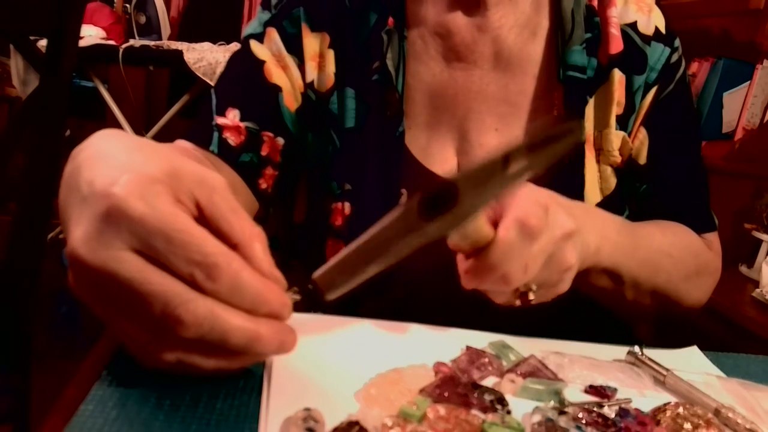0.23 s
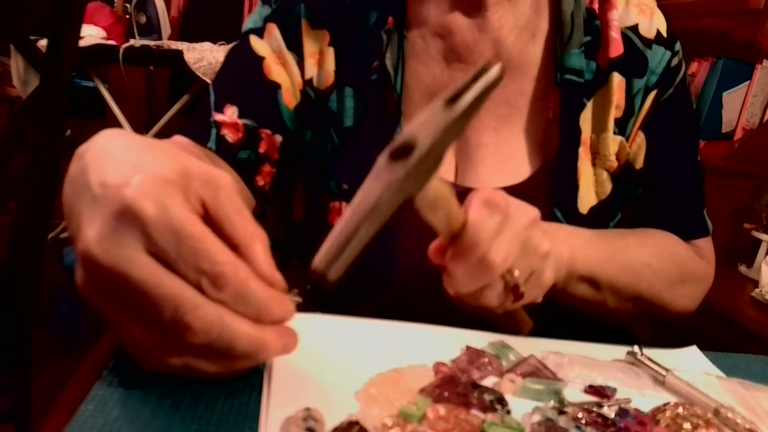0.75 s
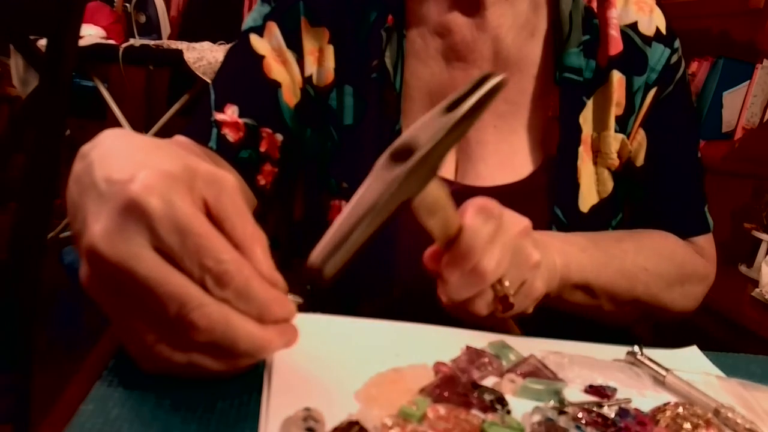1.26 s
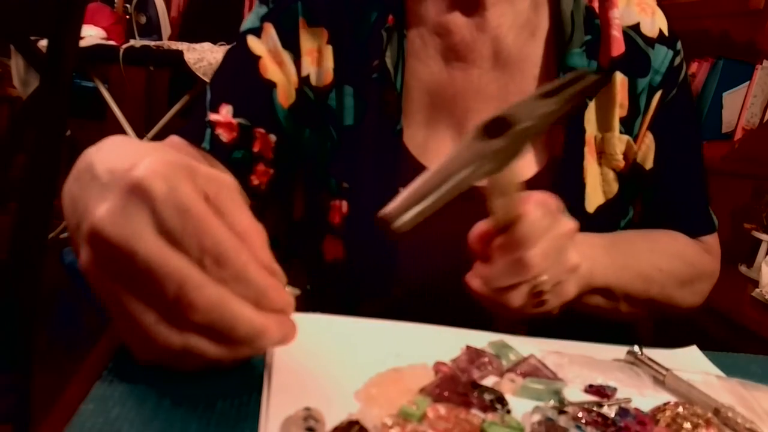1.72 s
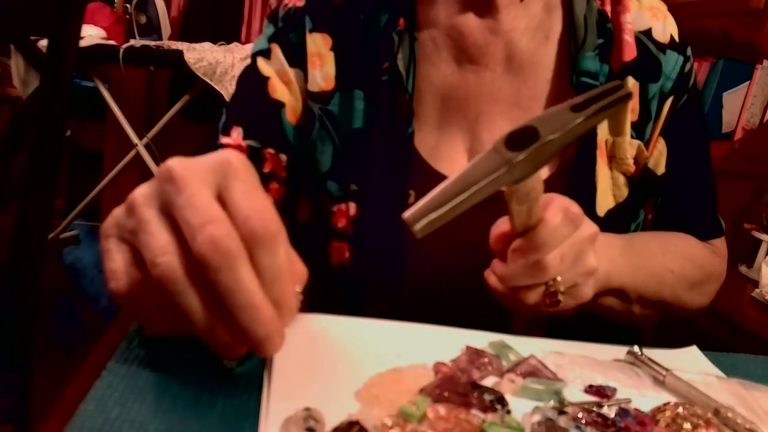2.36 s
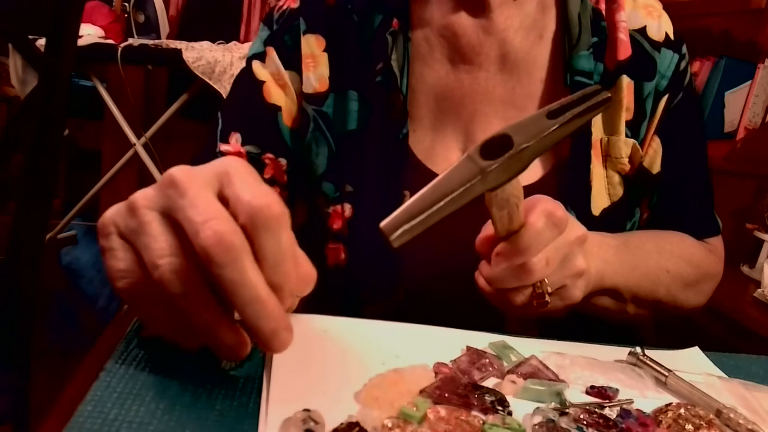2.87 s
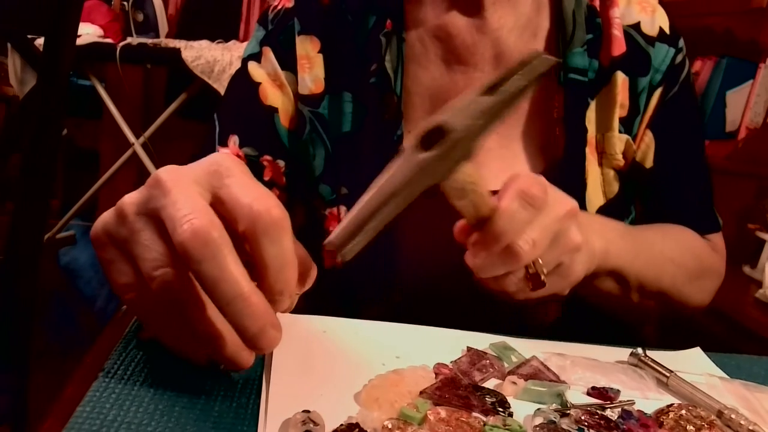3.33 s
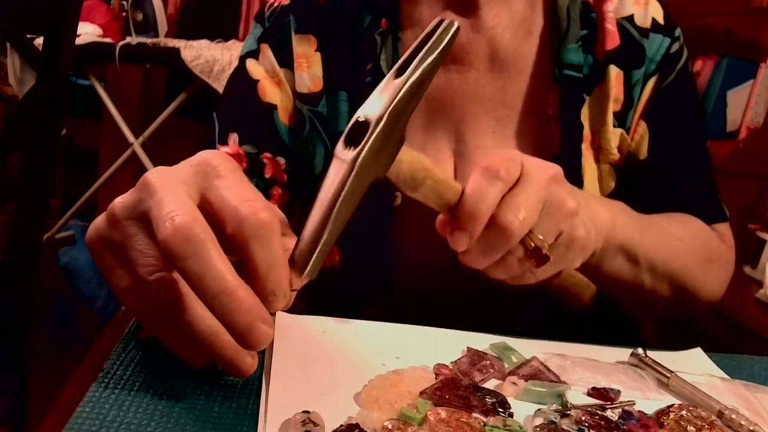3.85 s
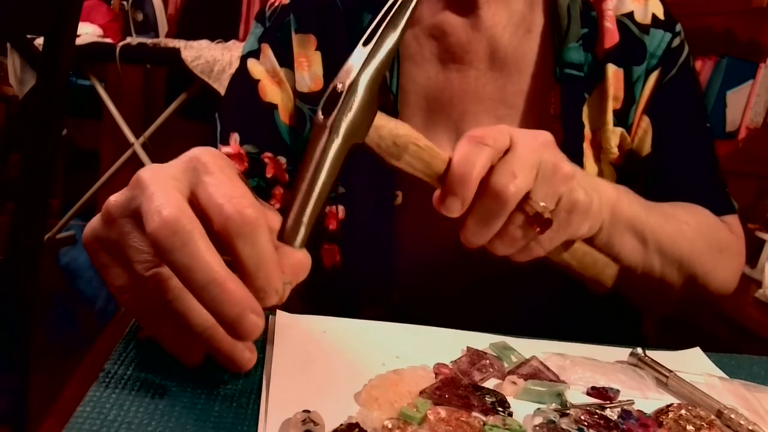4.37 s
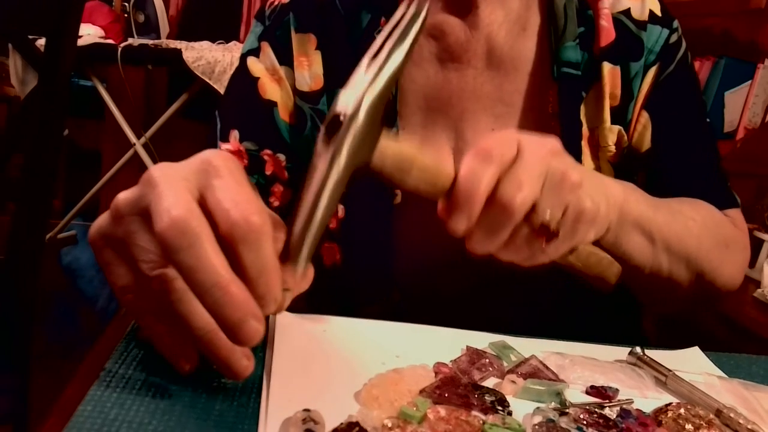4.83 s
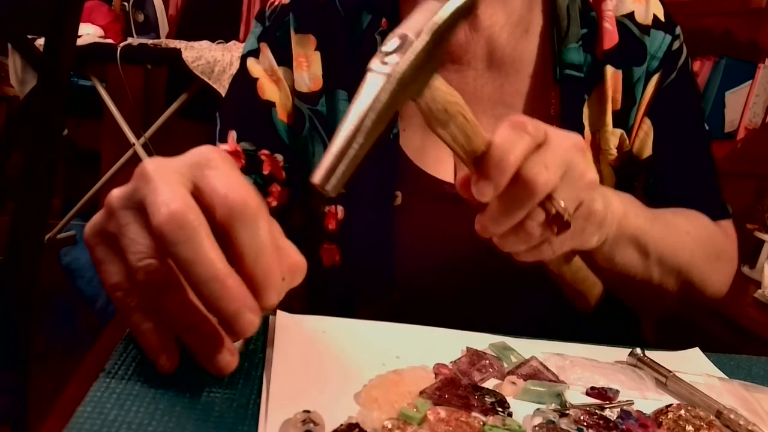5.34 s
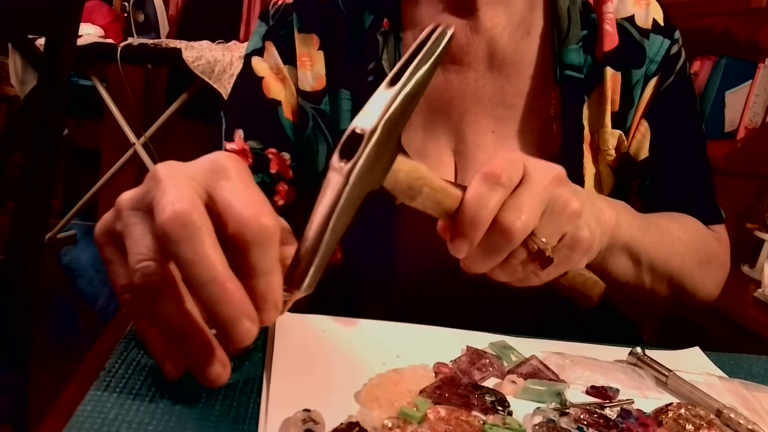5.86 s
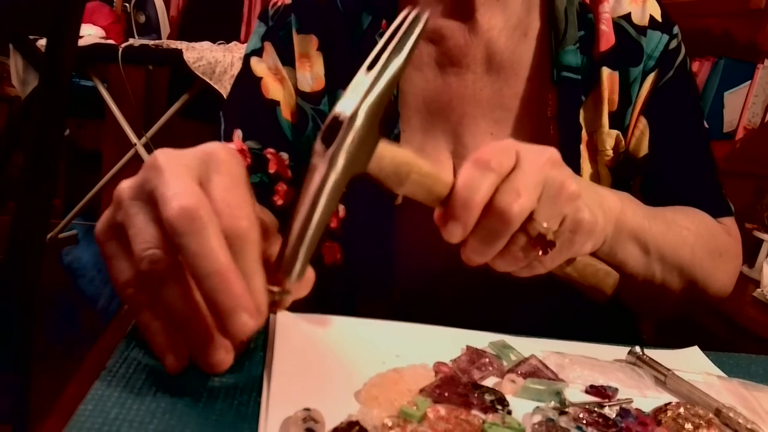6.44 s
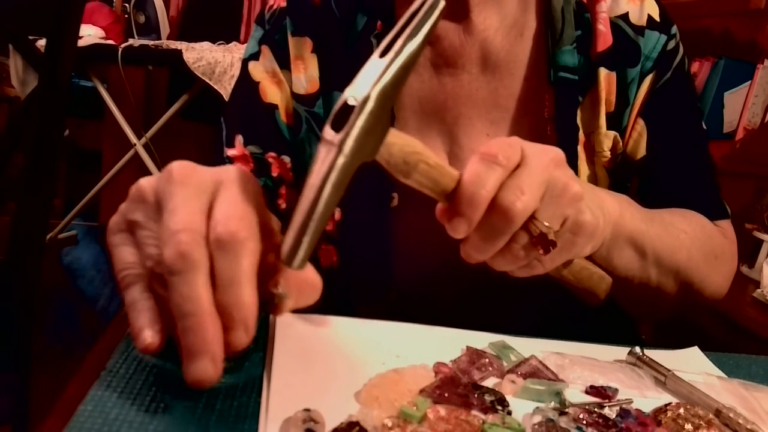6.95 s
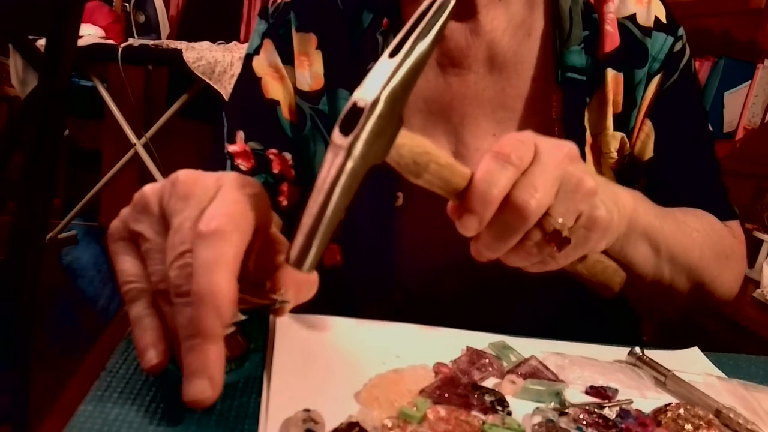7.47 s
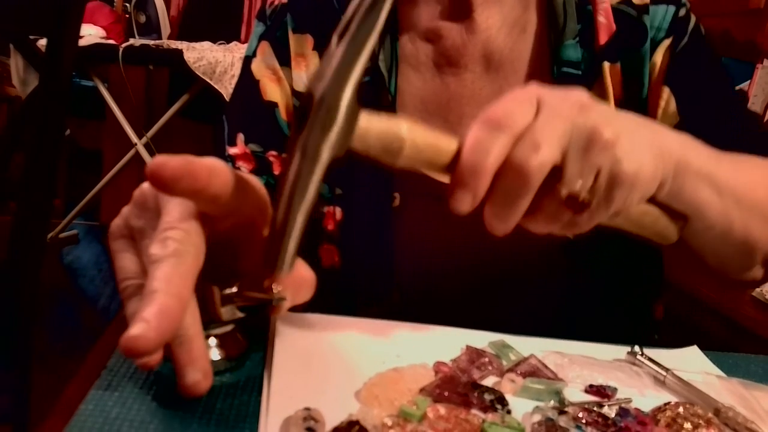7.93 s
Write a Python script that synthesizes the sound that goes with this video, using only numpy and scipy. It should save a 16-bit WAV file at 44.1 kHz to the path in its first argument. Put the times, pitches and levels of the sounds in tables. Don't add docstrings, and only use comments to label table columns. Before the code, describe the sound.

Sparse close metallic hammer blows on a small anvil, some feather-light, some sharp and clipping, with thin high ringing over soft fan hiss.

```python
import sys
import numpy as np
from scipy import signal
from scipy.fft import rfft, irfft, next_fast_len
from scipy.io import wavfile
from scipy.ndimage import uniform_filter1d, map_coordinates

SR = 44100
rng = np.random.default_rng(int(sys.argv[2]) if len(sys.argv) > 2 else 0)


def inscribe(sig):
    pcm = np.round(np.clip(np.atleast_2d(sig).T, -1, 1) * 32767)
    wavfile.write(sys.argv[1], SR, pcm.astype(np.int16))


def ratio(d):
    e = np.asarray(d, float) / 20
    return 10 ** e


N = 361619


def unit(x):
    return x / np.sqrt(np.mean(x ** 2) + 1e-20)


def along(points, hz):
    point_hz, value = np.transpose(points)
    return np.interp(np.log(hz + 1), np.log(point_hz + 1), value)


def noise(gain, size):
    m = next_fast_len(size)
    spectrum = rfft(rng.standard_normal(m)) * gain(np.fft.rfftfreq(m, 1 / SR))
    return unit(irfft(spectrum, m)[:size])


def patchy(x, depth_db):
    z = signal.stft(x, nperseg=512)[2]
    field = uniform_filter1d(rng.standard_normal(z.shape), size=6, axis=0)
    field = uniform_filter1d(field, size=12, axis=1)
    mottled = z * ratio(depth_db * unit(field))
    return unit(signal.istft(mottled, nperseg=512)[1][:N])


def ring(modes, t, scatter_db, attack):
    hz, db, t60 = np.transpose(modes)[..., None]
    strength_db = db + scatter_db * rng.standard_normal(hz.shape)
    decay = ratio(strength_db - 60 * t / t60)
    sines = np.sin(2 * np.pi * (hz * t + rng.random(hz.shape)))
    return np.sum(decay * sines, axis=0) * (1 - np.exp(-t / attack)) ** 2


def tilted(modes, db_per_octave, about_hz):
    return [(hz, db + db_per_octave * np.log2(hz / about_hz), t60) for hz, db, t60 in modes]


def clatter(low_hz, high_hz, t, t60):
    def band(f):
        return 1 / np.sqrt((1 + (low_hz / (f + 1)) ** 6) * (1 + (f / high_hz) ** 12))
    return ratio(-60 * t / t60) * noise(band, len(t))


# (frequency [Hz], t60 [s])
ROOM_DECAY = [(100, 0.25), (400, 0.3), (1500, 0.28), (4000, 0.22), (5600, 0.19), (7500, .15), (12000, 0.24)]


def add(out, s, x, wet_db):
    hz, t, z = signal.stft(rng.standard_normal(SR // 2), SR, nperseg=256)
    dying = z * ratio(-60 * t / along(ROOM_DECAY, hz)[:, None])
    tail = signal.istft(dying, SR, nperseg=256)[1]
    tail *= 1 - np.exp(-np.arange(len(tail)) / SR / 0.0017)
    late = np.pad(x, (130, 0))
    wet = ratio(wet_db) * signal.fftconvolve(late, tail / np.linalg.norm(tail))
    wet[:len(x)] += x
    out[round(s * SR):][:len(wet)] += wet


# (frequency [Hz], density [dB per Hz])
AIR_COLOUR = [(15, -49), (25, -18), (400, -4), (484, -4.5), (600, -7), (686, -3.5), (764, -6), (1180, -3.5),
              (1540, -7.5), (1710, -8), (4060, -13), (4900, -9), (5310, -13.5), (6590, -19), (15600, -24)]
# (frequency [Hz], width [Hz], level over the air [dB])
FAN_HUM = [(484, 27, 5.5), (671, 60, 5.5), (1156, 120, 1.5), (1720, 18, 8)]


def air():
    def colour(f):
        hum_db = sum(db / (1 + (2 * (f - hz) / width) ** 2) for hz, width, db in FAN_HUM)
        return ratio(along(AIR_COLOUR, f) + hum_db) * (f < 15800)
    hiss = patchy(noise(colour, N), depth_db=0.36)
    points = rng.standard_normal(int(N / SR * 3) + 4)
    drift = map_coordinates(points, [np.arange(N) * 3 / SR])
    return ratio(-59 + 0.26 * drift) * hiss


# (frequency [Hz], level [dB])
WHINE_TONES = [(4971, -65.5), (8000, -80.5), (3000, -78)]
SLOW_UNTIL_S, SLOW_RATE, FAST_RATE = .934, 15, 20


def whine():
    first_s, burst_s = .0005, .0265
    t = np.arange(N) / SR
    since_slow = (t - first_s) % (1 / SLOW_RATE)
    since_fast = (t - SLOW_UNTIL_S) % (1 / FAST_RATE)
    since = np.where(t < SLOW_UNTIL_S, since_slow, since_fast)
    gate = uniform_filter1d(1. * (since < burst_s), size=60)
    swell = 1 + 0.17 * np.cos(2 * np.pi * since / 0.025 - .6)
    tones = sum(ratio(db) * np.sin(2 * np.pi * hz * since) for hz, db in WHINE_TONES)
    return np.sqrt(2) * gate * swell * tones


# (middle [s], half length [s], level [dB])
MOVES = [
    (.03, .15, -74),
    (1.8, 0.29, -73),
    (2.447, 0.35, -70.5),
    (3.412, .5, -75),
    (4.08, 0.3, -67.5),
    (6.0, 0.43, -70),
    (6.703, 0.208, -70.5),
    (7.1, 0.19, -65),
    (8.15, 0.48, -70.5),
]
# (frequency [Hz], density [dB per Hz])
CLOTH_COLOUR = [(1500, -18), (2500, 4), (4200, -16), (5700, 3.5), (6600, -4.5), (8000, -22)]


def rustle():
    t = np.arange(N) / SR
    swell = sum(ratio(db) * np.exp(-((t - s) / half_s) ** 2) for s, half_s, db in MOVES)
    rubbing = noise(lambda f: ratio(along(CLOTH_COLOUR, f)), N)
    return ratio(0.5) * swell * patchy(rubbing, depth_db=1.5)


# (time [s], peak level [dB], pitch [Hz],
# spread [octaves], t60 [s])
WIRE_TICKS = [(.03, -52.5, 5200, 0.47, 0.079), (.085, -54, 4470, 0.38, 0.13), (.661, -63.5, 9400, .03, .05),
              (.684, -67, 9400, 0.037, 0.044), (1.165, -40, 4620, 1.23, 0.064),
              (3.07, -59, 5000, 0.42, 0.26), (3.078, -61, 3980, 0.055, .07), (4.41, -59, 3500, 0.72, 0.072),
              (1.7135, -42, 4400, 0.55, 0.013), (4.005, -60.5, 7550, 0.38, .01),
              (4.7605, -50, 5440, 0.95, 0.038), (5.029, -30, 5540, 0.5, 0.022),
              (5.0365, -8, 3028, 0.8, 0.0038), (5.339, -44, 8000, 0.29, 0.0082),
              (5.944, -47, 6960, 0.25, 0.0076), (5.952, -49, 7050, 0.31, .008),
              (6.132, -58, 6500, .4, .008), (6.619, -49.5, 4780, 0.52, 0.033),
              (8.0097, -39.5, 5400, 0.41, 0.008), (8.162, -52, 5060, 0.67, .02)]
# (time [s], peak level [dB], pitch [Hz], spread [octaves], t60 [s])
SOFT_BUMPS = [
    (4.28, -52, 300, 0.94, 0.066),
    (4.32, -50, 402, 0.74, 0.12),
    (6.97, -61, 3300, 0.068, 0.085),
    (7.005, -57, 2300, 0.058, 0.067),
    (8.16, -53, 900, 1.46, 0.093),
]


def touches(rows, wet_db):
    out, t = np.zeros(N + SR), np.arange(SR // 10) / SR
    for s, db, hz, spread, t60 in rows:
        puff = noise(lambda f: np.exp(-(np.log2(f / hz + 1e-9) / spread) ** 2), len(t))
        envelope = ratio(db + 3 - 60 * t / t60) * (1 - np.exp(-20 * t / t60))
        add(out, s, envelope * puff, wet_db)
    return out[:N]


# (first step [s], length [s], low mode level [dB], high mode relative to low [dB])
MOTOR_RUNS = [
    (0.1003, .15, -58.5, -9),
    (0.497, .01, -64, -5),
    (2.7646, .45, -59, -4),
    (3.267, .01, -55.5, 1),
    (3.363, .15, -61, -3),
    (4.418, .01, -55, -5),
    (4.914, .01, -59, 1),
    (5.2544, .01, -62, 6),
    (6.1634, .35, -59, -6),
    (7.8146, .35, -59, .1),
]


def jingles():
    out, t = np.zeros(N + SR), np.arange(SR // 10) / SR
    for first, length, db, high_db in MOTOR_RUNS:
        rate = SLOW_RATE if first < SLOW_UNTIL_S else FAST_RATE
        for s in np.arange(first, first + length, 2 / rate):
            step = ring([(2956, 0.5, .022), (4560, high_db - 3.5, .012)], t, scatter_db=2, attack=.001)
            step += ratio(-8.0) * clatter(2600, 5200, t, 0.012)
            late_s = .0015 * rng.standard_normal()
            add(out, s + late_s, ratio(db + 9.5) * step, wet_db=-11)
    return out[:N]


# (time [s], thud level [dB], knock relative to thud [dB],
# thud brightness [dB per octave], knock brightness [dB per octave])
TABLE_KNOCKS = [(0.66, -51, -11, -7, -2), (0.918, -49, -6, -11, 6), (1.1703, -26, 3.5, -19, 9),
                (1.4498, -20, 3, -0.5, 11.5), (4.2442, -39.5, -9.5, 1.5, -19), (4.491, -38, -9, 4, -22),
                (4.766, -17, -2.5, 16, 0.8), (5.0318, -13.5, 0.5, 1.9, 4.5), (5.917, -46.5, -9, -11, -6.5),
                (6.207, -51, -15, 2, 1), (6.416, -40, -12.5, 2.5, -10)]
# (frequency [Hz], level [dB], t60 [s])
DEEP_MODES = [(62.06, -6.5, 0.14), (125.4, 3, 0.16)]
THUD_MODES = [(165, -19, .06), (214, -3.5, 0.086), (252.5, -1, 0.069), (330, -2.5, 0.092),
              (394.7, 0, 0.084), (442.5, -5, .05)]
KNOCK_MODES = [(600.5, -8.5, 0.064), (671, -0.5, 0.04), (728, -0.5, 0.043), (768, -4, 0.045),
               (900, -10, .05), (958, 8, 0.03), (1094, -4, 0.034), (1242, -6.5, 0.052), (1356, 1, 0.025)]


def table():
    out, t = np.zeros(N + SR), np.arange(SR // 4) / SR
    for s, db, knock_db, thud_tilt_db, knock_tilt_db in TABLE_KNOCKS:
        x = ring(tilted(THUD_MODES, thud_tilt_db, 330), t, scatter_db=3.0, attack=0.00051)
        knock = ring(tilted(KNOCK_MODES, knock_tilt_db, 913), t, scatter_db=1.5, attack=0.00088)
        x += ratio(knock_db + 2.5) * knock
        rise = (1 - np.exp(-t / .0012)) ** 2
        x += ratio(knock_db + 1) * rise * clatter(450, 1500, t, 0.1)
        deep_db = -33.5 - 0.48 * db
        x += ratio(deep_db + 9.5) * ring(DEEP_MODES, t, scatter_db=3.5, attack=.004)
        add(out, s, ratio(db - 7) * x, wet_db=-10)
    return out[:N]


# (time [s], anvil level [dB], then relative to the anvil:
# block [dB], overtone [dB], crack [dB])
HAMMER_BLOWS = [(0.663, -50, 0, -15, 9), (.684, -47.5, -15, -15, 7), (0.9187, -44, -10, -13, 7),
                (.94, -45, -18, -14, 4), (1.1718, -3.5, -3.5, -24, -8), (1.4516, -3, 0.5, -27.5, -5),
                (4.2458, -39, -10.5, -9, 7), (4.4918, -38, -8, -4, 15), (4.532, -50, -1, -13, -6),
                (4.7598, -40.5, -8, -0.5, 5), (4.7667, -7.5, -1, -6, -16), (5.0325, -2.5, 2.5, -14, -3),
                (5.918, -49.5, -5, -10, 9), (6.208, -50.5, -4, -7, 8), (6.4144, -53.5, 11, 6.5, 3),
                (6.432, -45, -9.5, -4, -2)]
# (frequency [Hz], level [dB], t60 [s])
ANVIL_MODES = [(4085, -2.5, .052), (4062, -28, .28), (4120, -30, .13), (4330, 1, .008), (4600, -5, .009),
               (4900, -15, .016), (5240, -18, .025)]
OVERTONE_MODES = [(8382, 0, .045), (8405, -24, .25)]
CENTRE_MODES = [(9400, -53, .035)]
BLOCK_MODES = [(1480, -9, .03), (1700, -5, .035), (1850, -9, .03), (2060, -7, .025), (2250, -8, .025),
               (2440, -4, .03), (2600, -8, .025), (2790, -3, .03), (2970, -1.5, .025), (3220, -8, .025),
               (3480, -10, .02)]
# (frequency [Hz], density [dB per Hz])
CRACK_COLOUR = [(60, -40.5), (500, -13.5), (2000, -11), (4800, 11), (6000, -2), (7500, -25), (9500, -24),
                (11000, -48.5), (16000, -71)]


def blows():
    steel, body, t = np.zeros(N + SR), np.zeros(N + SR), np.arange(SR // 4) / SR
    squeeze = 1 - np.exp(-(t / .0011) ** 2)
    for s, db, block_db, over_db, crack_db in HAMMER_BLOWS:
        start = s - .0015
        x = ring(ANVIL_MODES, t, scatter_db=1.1, attack=.0002)
        x += ratio(-over_db) * ring(CENTRE_MODES, t, scatter_db=3.0, attack=.0004)
        x += ratio(over_db - 0.5) * ring(OVERTONE_MODES, t, scatter_db=3.0, attack=.0015)
        add(steel, start, ratio(db - 1.5) * squeeze * x, wet_db=-20)

        tilt = 0.46 * (-17 - over_db)
        x = ring(tilted(BLOCK_MODES, tilt, 2400), t, scatter_db=1.0, attack=0.00018)
        x += ratio(8.0) * clatter(1500, 4900, t, 0.012)
        add(body, start, ratio(db + block_db - 8) * squeeze * x, wet_db=-13)

        crack = ratio(-60 * t / 0.011) * noise(lambda f: ratio(along(CRACK_COLOUR, f)), len(t))
        add(body, start, ratio(db + crack_db - 4) * squeeze * crack, wet_db=-5)
    return (steel + body)[:N]


# (time [s], level [dB], t60 left by the grip [s],
# delay until it faces the microphone [s], gain when facing [dB])
HEAD_SONG = [
    (.925, -65, 1.1, .1, -10),
    (1.175, -53, .8, 0.055, 0.5),
    (1.453, -52.5, .75, 0.1, 4),
    (4.25, -77, 1.1, 0.045, 6),
    (4.495, -59.5, .35, 0.17, 0),
    (4.77, -74, 1.1, .18, 14),
    (5.034, -39, 1.15, .19, 5.5),
    (6.43, -80, .6, .03, 6),
]


def hammer_head():
    head_hz, swing_s, attack_s = 6202.5, .065, .006
    t, gain = np.arange(N) / SR, np.zeros(N)
    for s, db, t60, facing_s, facing_db in HEAD_SONG:
        since = np.maximum(t - s, 0)
        swell_db = facing_db * np.exp(-((since - facing_s) / swing_s) ** 2)
        song = ratio(db - 60 * since / t60 + swell_db) * (1 - np.exp(-since / attack_s))
        gain = np.where(t >= s, song, gain)
    return np.sqrt(2) * gain * np.sin(2 * np.pi * head_hz * t)


def scene():
    background = air() + rustle() + whine()
    small = touches(WIRE_TICKS, wet_db=-18.5) + touches(SOFT_BUMPS, wet_db=-2) + jingles()
    hammering = table() + blows() + hammer_head()
    return (background + small + hammering)[None]


def top_cut(x):
    return signal.sosfilt(signal.butter(12, 16300, fs=SR, output="sos"), x)


def record(dry):
    heard = signal.sosfilt(signal.butter(2, 45, "high", fs=SR, output="sos"), dry)
    clipped = heard / (1 + np.abs(heard / .715) ** 32) ** (1 / 32)
    return top_cut(clipped)


dry = scene()
out = record(dry)
inscribe(out)
```